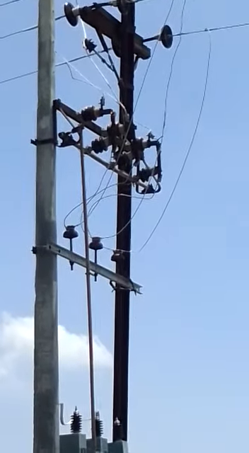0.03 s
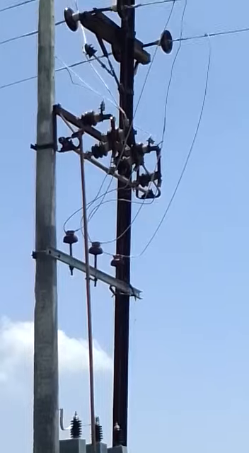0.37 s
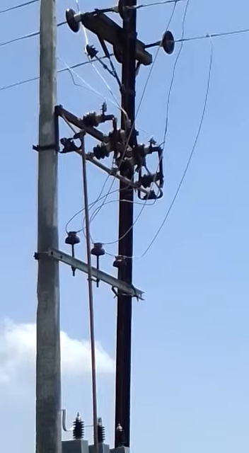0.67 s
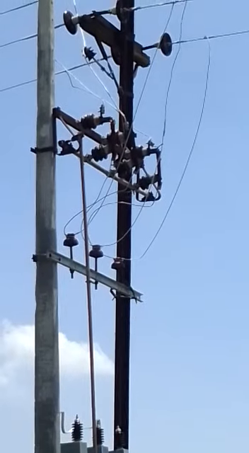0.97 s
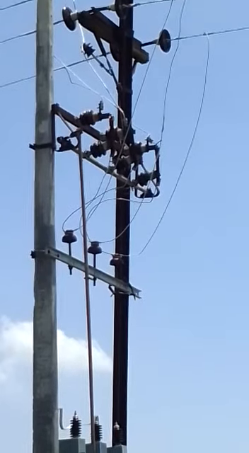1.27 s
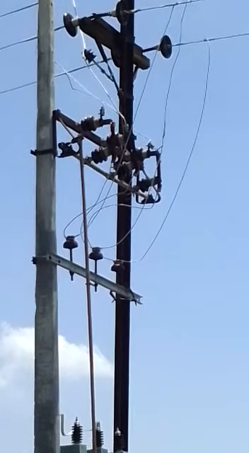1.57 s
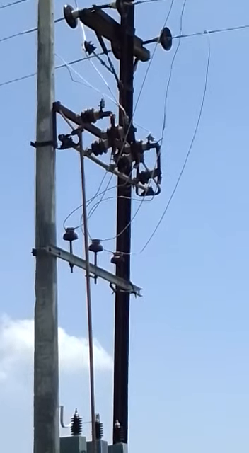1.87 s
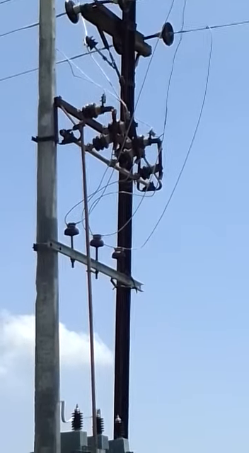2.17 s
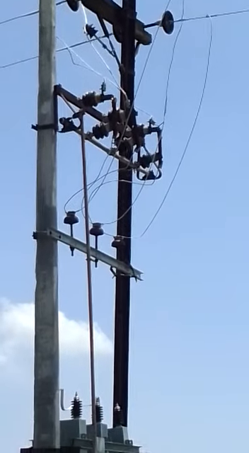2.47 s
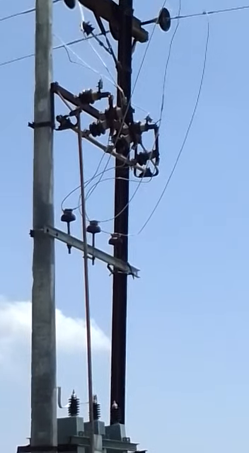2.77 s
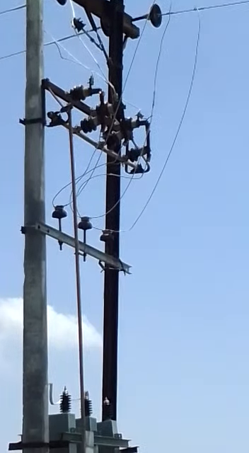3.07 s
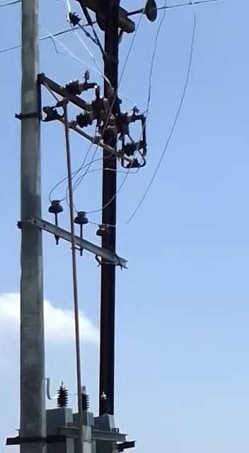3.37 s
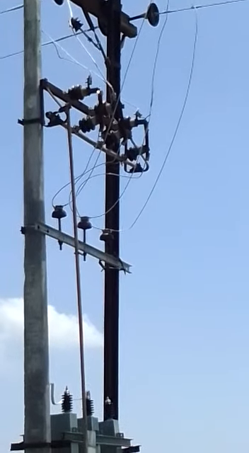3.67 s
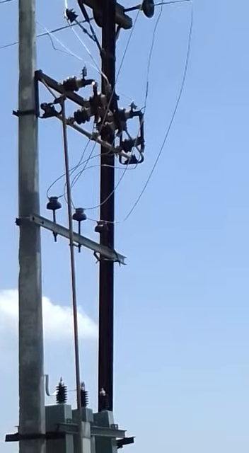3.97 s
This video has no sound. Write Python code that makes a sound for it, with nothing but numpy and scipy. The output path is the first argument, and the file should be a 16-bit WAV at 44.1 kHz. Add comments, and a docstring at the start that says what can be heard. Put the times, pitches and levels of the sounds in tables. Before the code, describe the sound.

Insulators on a pole-top transformer station give a steady high sizzle over a lower electrical buzz. About halfway through, a spark cracks and fries briefly. Wind rumbles on the microphone, which is outdoors on the ground below.

```python
"""A high sizzle over a lower buzz, heard from the ground below a pole-top transformer station.
Leaking insulators throw bursts of tiny sparks in every cycle of the mains, over a faint hum.
Once, the discharge flares into a short crack and fries briefly.
Wind buffets the microphone, there are a few soft scuffs, and a far bird chips faintly."""
import sys
import numpy as np
from scipy import signal
from scipy.fft import rfft, irfft
from scipy.io import wavfile
from scipy.ndimage import uniform_filter1d

SR = 44100
rng = np.random.default_rng(int(sys.argv[2]) if len(sys.argv) > 2 else 0)


def generate_wav(sig):
    """Save sig (samples, or channels by samples) to the path in sys.argv[1] as 16-bit PCM at SR."""
    pcm = np.round(np.clip(np.atleast_2d(sig).T, -1, 1) * 32767).astype(np.int16)
    wavfile.write(sys.argv[1], SR, pcm)


N = 176400
T = np.arange(N) / SR
MAINS_HZ = 50.135

# Spark bursts and their quick echoes within one mains cycle: t/s, width/s, relative level/dB
SIZZLE_CYCLE = [(.0005, .0006, 1), (.0046, .0005, -4.5), (.0078, .0005, -11.5), (.0115, .0003, -7),
                (.0144, .0014, -13), (.0178, .0005, -10)]
BUZZ_CYCLE = [(.0015, .0003, -4), (.0048, .0002, -2), (.0115, .0005, -9), (.0133, .00025, 0),
              (.0145, .0003, 0), (.018, .0004, -5), (.0195, .0005, -8)]
# Tone colour (how strong each frequency is) of each spark layer: f/Hz, relative level/dB
SIZZLE_COLOUR = [(6100, -38.5), (6620, -20), (6760, -3), (6900, -0.5), (7450, 2.5), (7650, -1), (8100, -2),
                 (8550, -8.5), (8850, -24), (9000, -6.5), (9200, -27.5)]
HISS_COLOUR = [(7700, -8), (8400, 2), (9600, -7), (10100, -27), (11900, -20), (12500, -3.5), (13000, -2.5),
               (13500, -15)]  # two hissing bands where the fizz gathers for a while
FIZZ_COLOUR = [(9350, -25.5), (9780, -11), (10200, -16), (10650, -14), (10900, -26.5), (11650, -25.5),
               (12050, -9.5), (12500, -15.5), (12880, -2.5), (13250, -12.5), (13720, -2), (14350, -13.5)]  # above the sizzle
TOP_COLOUR = [(14700, -23), (15100, -20.5), (15400, 0), (15700, 1), (15850, -15.5)]  # the very highest fizz
BUZZ_COLOUR = [(700, -13.5), (1200, -2.5), (1600, -8.5), (1900, -3.5), (2230, 5), (2670, -5.5), (2950, 2.5),
               (3250, -9.5), (3650, -3), (4200, -9.5), (4950, -3), (5300, -6), (6500, -6.5)]
# How loud each layer is as time passes: t/s, level/dB
SIZZLE_LOUDNESS = [(0, -56), (.45, -59), (0.648, -65), (1.099, -54.5), (1.75, -55), (2.128, -59),
                   (2.45, -55), (2.8, -54.5), (3.048, -58.5), (3.45, -58), (4, -58)]
HISS_LOUDNESS = [(0, -95), (2.15, -80), (2.36, -60), (2.78, -66.5), (2.95, -70)]
FIZZ_LOUDNESS = [(0, -66.5), (.35, -60.5), (.7, -69.5), (1.1, -60), (1.36, -62), (1.46, -69), (1.9, -57.5),
                 (2.15, -71.5), (2.8, -79.5), (2.98, -59), (3.27, -75.5), (3.402, -66.5), (3.72, -81.5),
                 (3.95, -94)]
TOP_LOUDNESS = [(0, -71), (.48, -65), (0.703, -74), (1.102, -59), (1.65, -74.5), (1.898, -67), (2.2, -86),
                (2.828, -87), (2.95, -63), (3.15, -69), (3.502, -76), (3.9, -104)]
BUZZ_LOUDNESS = [(0, -71.5), (.65, -77.5), (1.048, -73.5), (1.6, -76.5), (1.851, -70), (2.15, -78.5),
                 (2.8, -76), (2.95, -73.5), (4, -77)]
def discharge():
    """Current leaks over the insulators as tiny sparks: a sizzle, a fizz and a lower buzz."""
    sizzle = sparks(SIZZLE_CYCLE, between_db=-20.5, uneven_db=1.2, wander_s=.00016, memory=.35,
                    grain_db=2.2)
    fizz = sparks(SIZZLE_CYCLE, between_db=-17, uneven_db=1.2, wander_s=.00016, memory=.55, grain_db=2.2)
    fizz = shimmering(fizz, ripple_db=5)
    sizzle = shimmering(sizzle, ripple_db=3.2)
    buzz = sparks(BUZZ_CYCLE, between_db=-19, uneven_db=1.5, wander_s=.0001, memory=.75, grain_db=1)
    layers = [(sizzle, SIZZLE_COLOUR, SIZZLE_LOUDNESS),
              (fizz, HISS_COLOUR, HISS_LOUDNESS),
              (fizz, FIZZ_COLOUR, FIZZ_LOUDNESS),
              (fizz, TOP_COLOUR, TOP_LOUDNESS),
              (buzz, BUZZ_COLOUR, BUZZ_LOUDNESS)]
    return sum(reflected(colour(x, tone)) * level(loudness) for x, tone, loudness in layers)


def sparks(bursts, between_db, uneven_db, wander_s, memory, grain_db):
    """Sparks return at the same places in each mains cycle; memory is how much of the last repeats."""
    period = round(SR / MAINS_HZ)
    cycles = N // period + 3
    fresh = rng.standard_normal((cycles, period))  # one row per cycle
    noise = signal.lfilter([1], [1, -memory], fresh, axis=0).ravel()[:N]
    wandering_time = T + wander_s * drift(7.5)
    power = amp(between_db) ** 2  # quiet hiss between bursts
    for place, width, db in bursts:
        turns = (wandering_time - place) * MAINS_HZ + 1
        cycle = np.round(turns).astype(int)
        size = amp(db + uneven_db * np.clip(rng.standard_normal(cycles + 2), -2, 2))
        power = power + size[cycle] ** 2 * bell((turns - cycle) / MAINS_HZ, width)
    grain = amp(grain_db * drift(1600))
    return unit(noise * np.sqrt(power) * grain)


def shimmering(x, ripple_db, ripple_hz=130, ripple_s=.8):
    """Narrow peaks and dips drift slowly through the tone colour."""
    size, hop = 1024, 256
    spectra = signal.stft(x, nperseg=size, noverlap=size - hop)[2]
    bins, frames = round(ripple_hz * size / SR), round(ripple_s * SR / hop)
    ripple = uniform_filter1d(rng.standard_normal(spectra.shape), bins, 0)  # smooth across frequency
    ripple = unit(uniform_filter1d(ripple, frames, 1))  # and across time
    gain = amp(ripple_db * np.clip(ripple, -2, 2))
    return signal.istft(spectra * gain, nperseg=size, noverlap=size - hop)[1][:N]


# Quick echoes: delay/s, gain
ECHOES = [(.0014, .24), (.0054, .15), (.0072, .2)]
def reflected(x):
    """Sound bounces off crossarms, poles and ground; the sum is scaled to strength 1."""
    return unit(x + sum(gain * np.roll(x, round(delay * SR)) for delay, gain in ECHOES))


# The snaps that make up the crack: t/s, peak level/dB
FLARE_SNAPS = [(1.8895, -45), (1.8958, -32), (1.8993, -42), (1.9092, -45), (1.915, -34.5), (1.943, -46)]
# Tone colours of the snaps and the frying: f/Hz, relative level/dB
SNAP_COLOUR = [(600, -36), (1300, -23), (2100, -15), (4200, -20), (6300, -17), (7100, 8), (9000, -11),
               (11300, -19), (13300, -2), (15000, -13)]
FRY_COLOUR = [(700, -34), (1800, -3), (4500, -13.5), (6500, 0.5), (11500, -1), (13300, 5), (16000, 0)]
def flare(snap_s=.0006, tail_db=-23, tail_s=.009,
          fry_start_s=1.89, fry_end_s=2.05, fry_db=-51, sag_db_per_s=76, release_s=.031):
    """A few much stronger sparks crack, then frying sags and goes out."""
    snap_shape = 0
    for t, db in FLARE_SNAPS:
        tail = amp(tail_db) * (T > t) * np.exp(-abs(T - t) / tail_s)  # scattered sound
        snap_shape += amp(db) * (bell(T - t, snap_s) + tail)
    snaps = rng.standard_normal(N) * snap_shape
    fry = sparks(BUZZ_CYCLE, between_db=-9, uneven_db=2, wander_s=.0004, memory=0, grain_db=3)
    age = np.maximum(T - fry_start_s, 0)
    burn = (age > 0) * amp(fry_db - sag_db_per_s * age)
    going_out = np.exp(-np.maximum(T - fry_end_s, 0) / release_s)
    return colour(snaps, SNAP_COLOUR) + colour(fry, FRY_COLOUR) * burn * going_out


# The wind's rumble as time passes, and its single buffets at their peaks: t/s, level/dB
WIND_LOUDNESS = [(0, -47), (.55, -43), (.62, -52), (.72, -45), (.85, -51), (1.02, -45), (1.16, -50),
                 (1.3, -45.5), (1.42, -53), (1.56, -54), (1.75, -61), (1.9, -58), (1.99, -49), (2.06, -54),
                 (2.17, -52), (2.28, -57), (2.6, -65), (2.85, -65), (2.97, -56), (3.3, -64), (3.58, -50.5),
                 (3.8, -63), (4, -59)]
WIND_BUFFETS = [(0.284, -36.5), (0.36, -37.5), (.505, -30.5), (0.556, -34), (1.018, -43), (1.27, -44),
                (2.155, -39), (2.183, -42.5)]
# Tone colours of the rumble, the gusts and the outdoor air: f/Hz, relative level/dB
RUMBLE_COLOUR = [(15, 4), (45, 9), (88, 3), (130, -5.5), (180, -20), (260, -39.5)]
GUST_COLOUR = [(20, -12), (55, 3), (95, 4), (150, -9), (210, -20), (280, -38), (430, -52)]
AIR_COLOUR = [(200, 7.5), (330, 2), (450, 0), (700, -4), (1200, 1.5), (4000, -2.5), (16000, -8.5)]
def wind(lumpy_db=3, buffet_s=.008, bright_db=-47, bright_growth=1.75, air_db=-75):
    """Wind on the microphone rumbles, thumps and brightens as it rises, over a steady hush of air."""
    rumble = steadied(colour(rng.standard_normal(N), RUMBLE_COLOUR), span_s=.055)
    gust = steadied(colour(rng.standard_normal(N), GUST_COLOUR), span_s=.0268)
    air = colour(rng.standard_normal(N), AIR_COLOUR)
    force = level(WIND_LOUDNESS)
    lumps = amp(lumpy_db * drift(12))
    buffets = sum(amp(db) * bell(T - t, buffet_s) for t, db in WIND_BUFFETS)
    brightening = amp(bright_db) * (force / force.max()) ** bright_growth
    return force * lumps * rumble + (buffets + brightening) * gust + amp(air_db) * air


# The tones in the hum: f/Hz, level/dB
HUM_TONES = [(300.8, -88), (351, -91.5), (501.3, -96.5), (601.6, -97.5), (651.8, -98.5), (802.2, -99.5),
             (1103, -93.5), (1253.4, -94.5), (1704.6, -92)]
def hum(waver_db=2):
    """The transformer core hums at multiples of the mains frequency; each tone wavers in level."""
    sound = 0
    for hz, db in HUM_TONES:
        peak = np.sqrt(2) * amp(db + waver_db * drift(12.5))
        sound += peak * np.sin(2 * np.pi * (hz * T + rng.random()))
    return sound


# Faint scuffs: t/s, centre f/Hz, peak level/dB
SCUFFS = [(0.153, 1070, -68), (0.776, 2080, -68.5), (.95, 467, -75.5), (1.354, 1430, -70.5),
          (1.806, 1220, -68.5), (3.928, 666, -73)]
def scuffs(width_s=.0085, width_octaves=.7):
    """Soft, short puffs of mid-pitched noise."""
    octave = np.log2(np.fft.rfftfreq(N, 1 / SR) + 1)
    spectrum = rfft(rng.standard_normal(N))
    sound = 0
    for t, hz, db in SCUFFS:
        band = unit(irfft(spectrum * bell(octave - np.log2(hz), width_octaves), N))
        sound += amp(db) * bell(T - t, width_s) * band
    return sound


# The bird's calls: t/s, f/Hz, peak level/dB
BIRD_CHIPS = [(3.146, 5700, -70), (3.276, 5000, -71), (3.36, 5550, -69), (3.371, 4800, -70),
              (3.494, 4900, -68), (3.578, 5700, -70), (3.588, 4600, -71), (3.798, 5600, -70)]
def bird(width_s=.004, rough_hz=220):
    """A far bird gives very short chips, made rough by a fast wobble in pitch."""
    wobble = np.cumsum(rough_hz * drift(740)) / SR
    return sum(amp(db) * bell(T - t, width_s) * np.sin(2 * np.pi * (hz * T + wobble))
               for t, hz, db in BIRD_CHIPS)


def amp(db):
    """Turns decibels into a gain to multiply by."""
    return 10 ** (np.asarray(db) / 20)


def unit(x):
    """Scales a signal to an average strength (rms) of 1."""
    return x / np.sqrt(np.mean(x ** 2) + 1e-20)


def level(curve):
    """Joins (t/s, level/dB) points into a gain over time."""
    return amp(np.interp(T, *np.transpose(curve)))


def colour(x, points, edge_db_per_octave=60):
    """Gives a sound a tone colour that falls steeply past its ends; white noise keeps its power."""
    hz, db = np.transpose(points)
    octave, known = np.log2(np.fft.rfftfreq(2 * N, 1 / SR) + 1), np.log2(hz)
    beyond = abs(octave - np.clip(octave, known[0], known[-1]))
    gain = amp(np.interp(octave, known, db) - edge_db_per_octave * beyond)
    return irfft(rfft(x, 2 * N) * unit(gain))[:N]


def drift(rate_hz):
    """A smooth random wiggle of strength 1, up to about the given rate."""
    f = np.fft.rfftfreq(N, 1 / SR)
    keep_slow = np.exp(-(f / rate_hz) ** 2) * (f > 0)
    return unit(irfft(rfft(rng.standard_normal(N)) * keep_slow, N))


def bell(t, width):
    """A smooth swell around t = 0."""
    return np.exp(-(t / width) ** 2 / 2)


def steadied(x, span_s):
    """Evens out the slow swells of a noise."""
    return x / np.sqrt(uniform_filter1d(x ** 2, int(span_s * SR)) + 1e-12)


def scene():
    """Everything at one microphone."""
    return (discharge() + flare() + hum() + wind() + scuffs() + bird())[None]


def record(dry, edge_hz=15840, offset=.0043):
    """The recorder cuts the highest treble and adds a small constant offset."""
    treble_cut = signal.firwin(1023, edge_hz, window=("kaiser", 9), fs=SR)
    return offset + signal.oaconvolve(dry, treble_cut[None], "same")


dry = scene()
out = record(dry)
generate_wav(out)
```